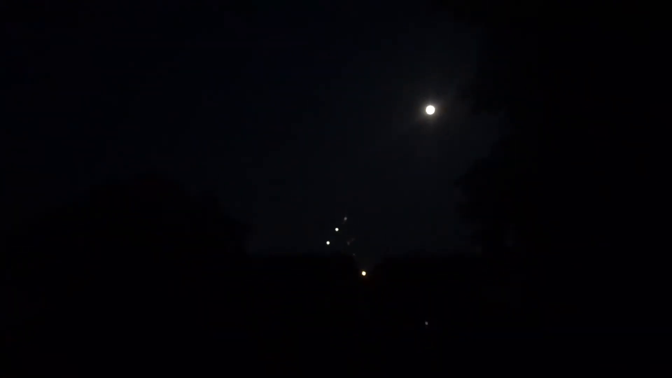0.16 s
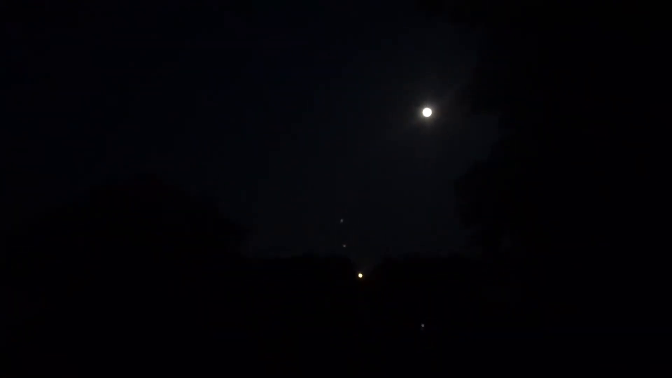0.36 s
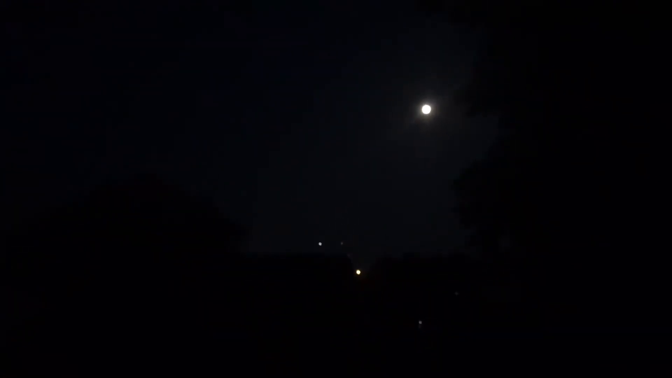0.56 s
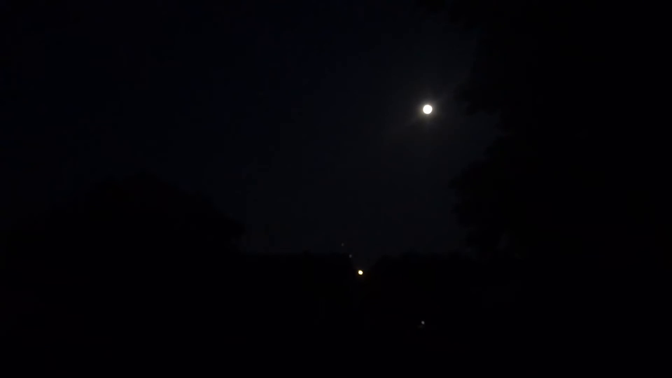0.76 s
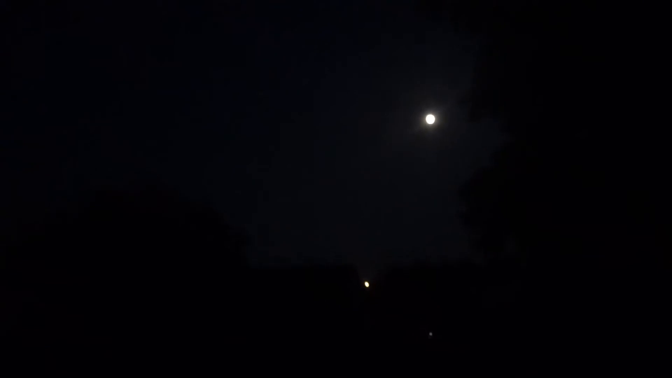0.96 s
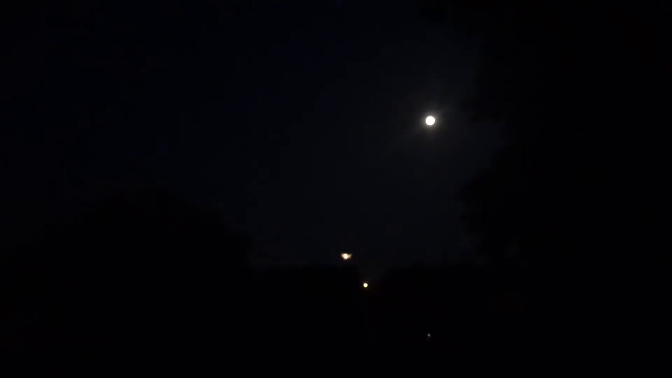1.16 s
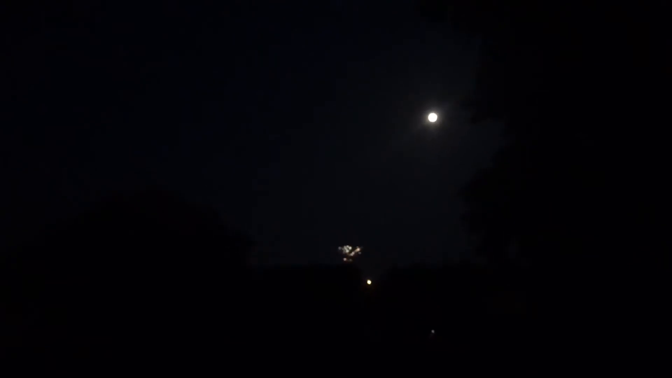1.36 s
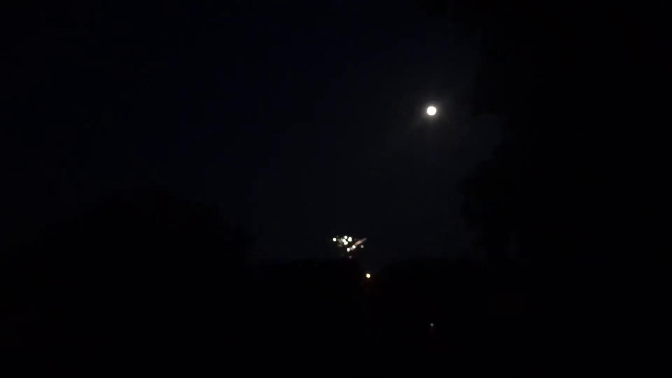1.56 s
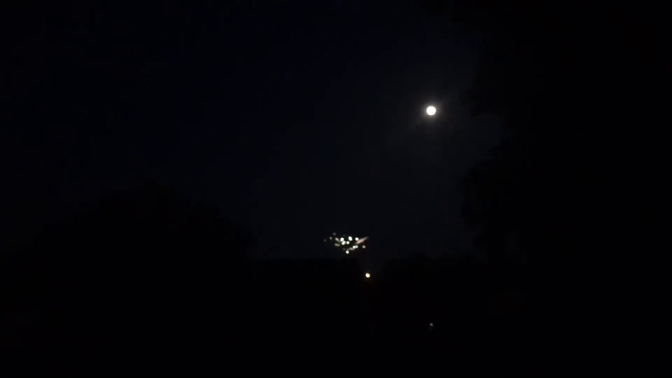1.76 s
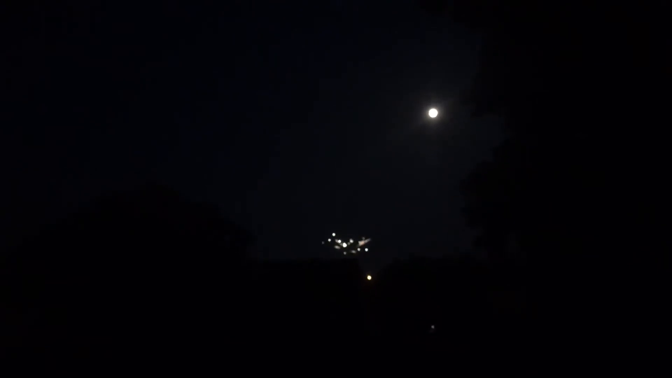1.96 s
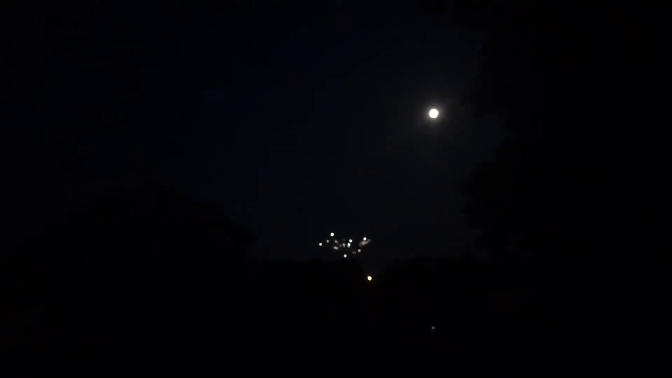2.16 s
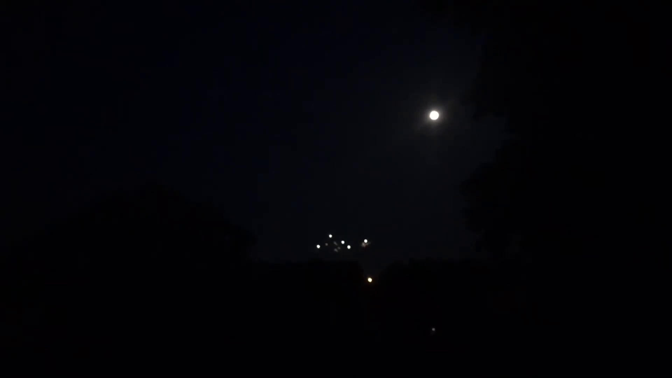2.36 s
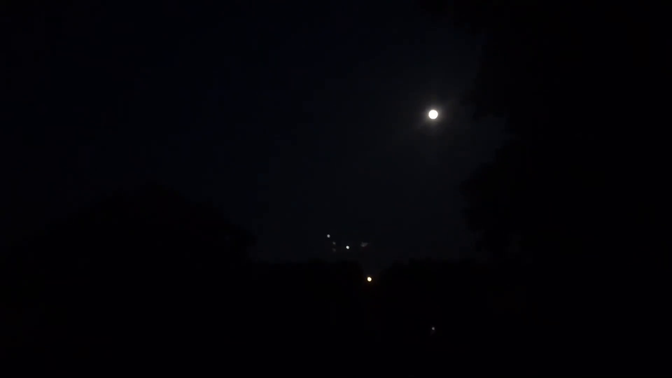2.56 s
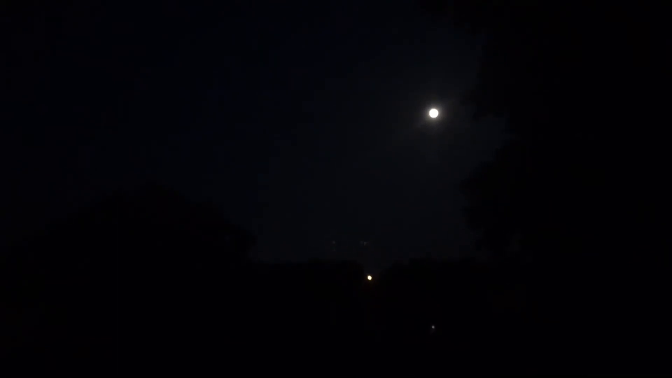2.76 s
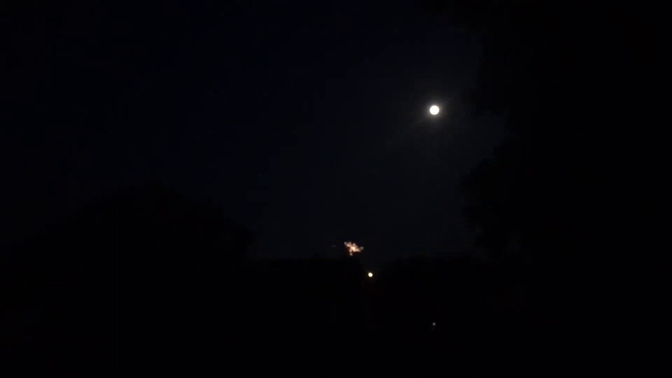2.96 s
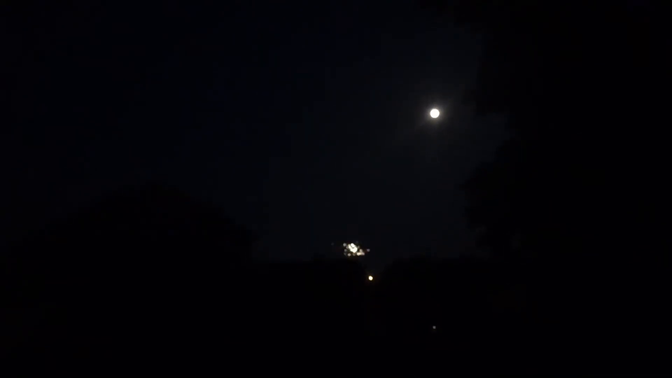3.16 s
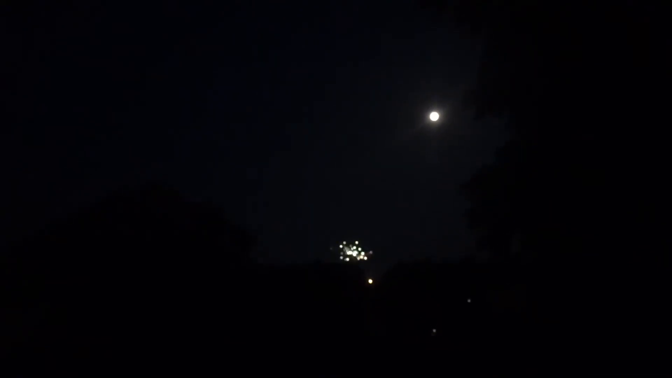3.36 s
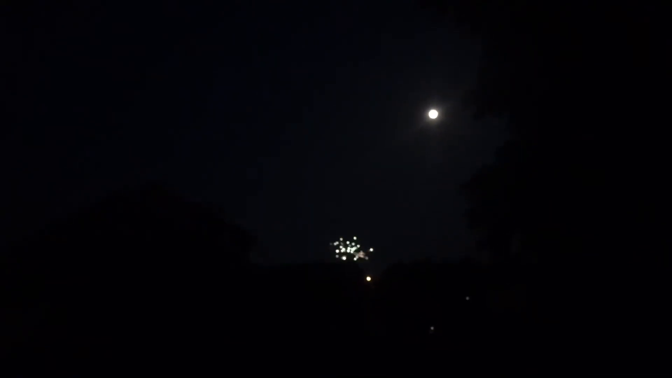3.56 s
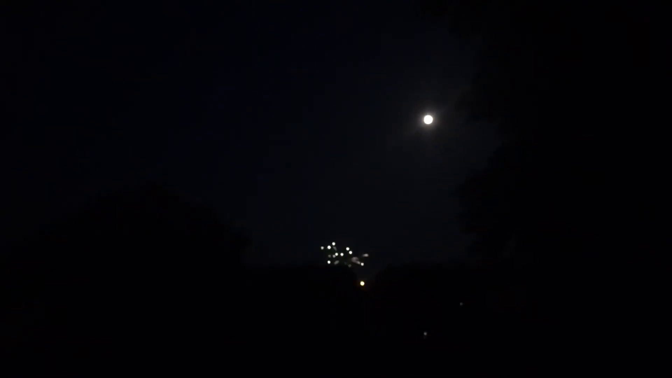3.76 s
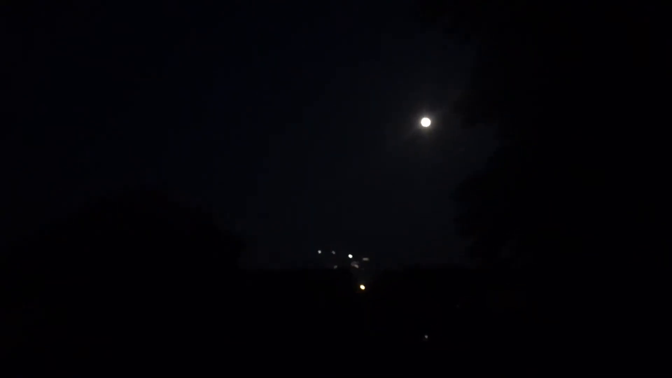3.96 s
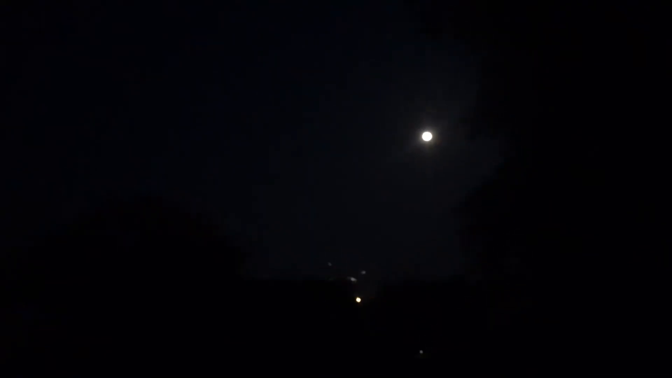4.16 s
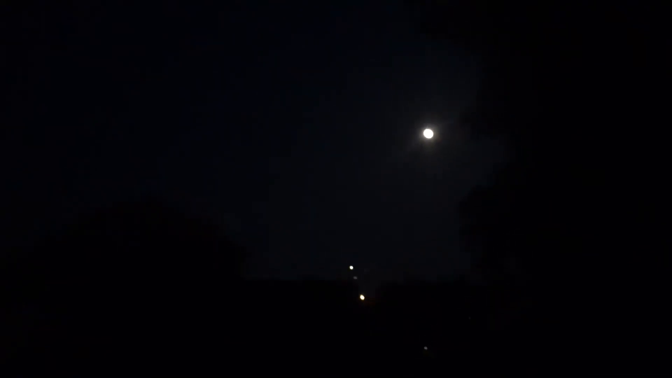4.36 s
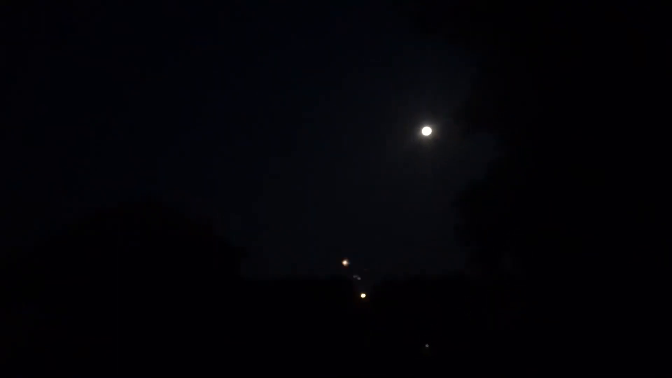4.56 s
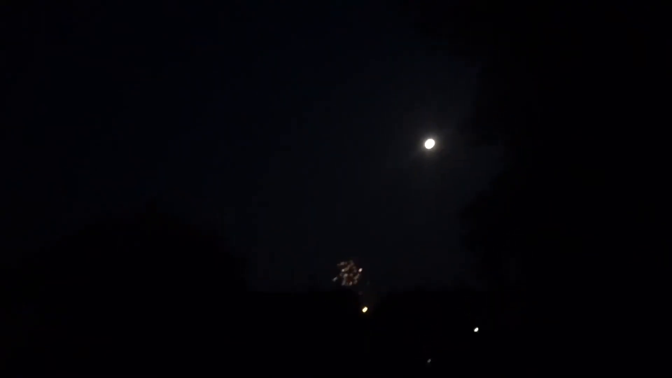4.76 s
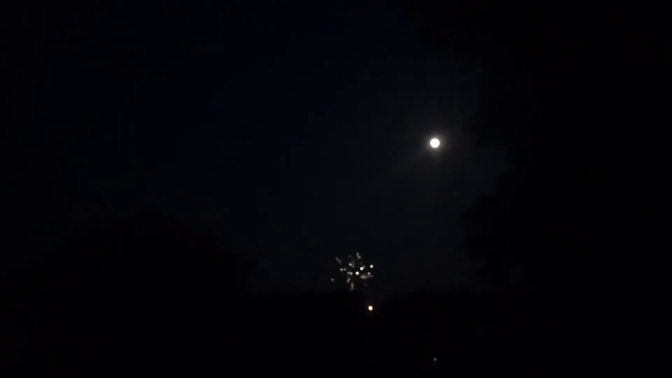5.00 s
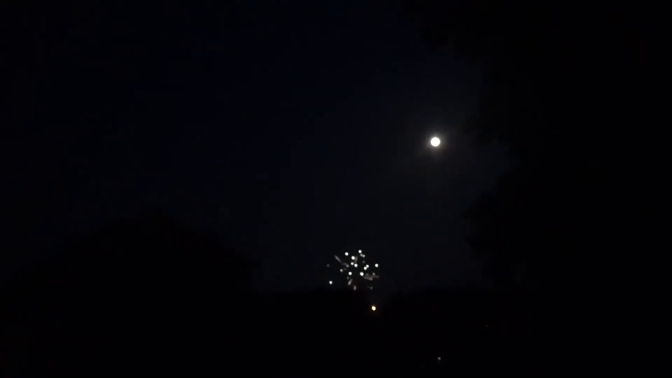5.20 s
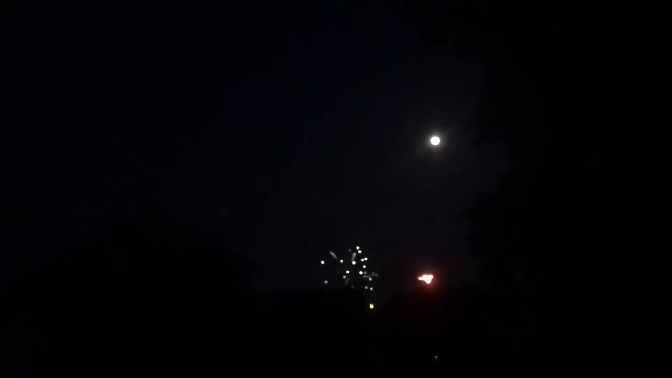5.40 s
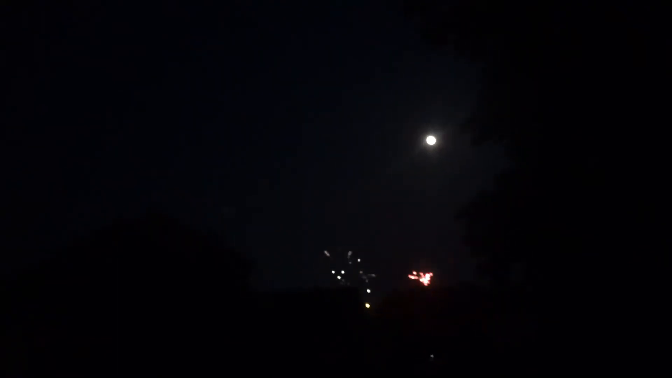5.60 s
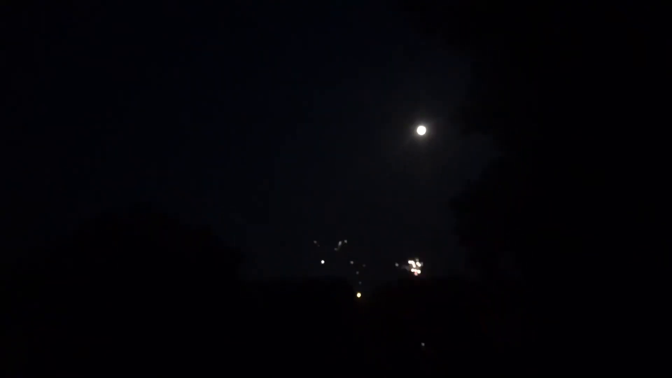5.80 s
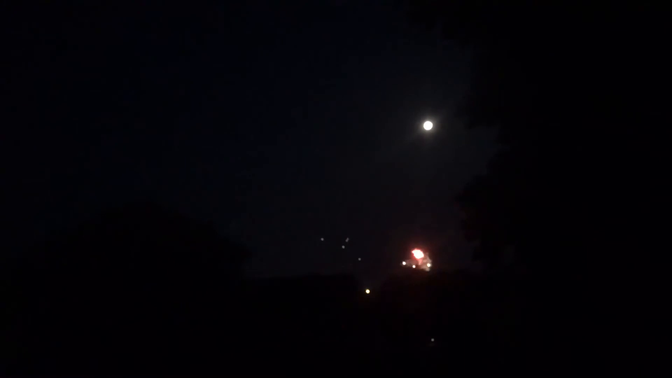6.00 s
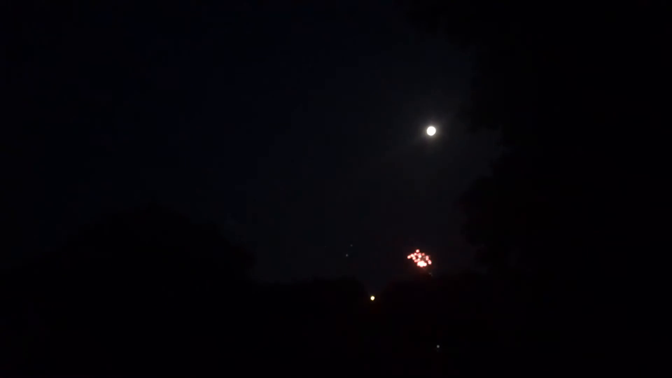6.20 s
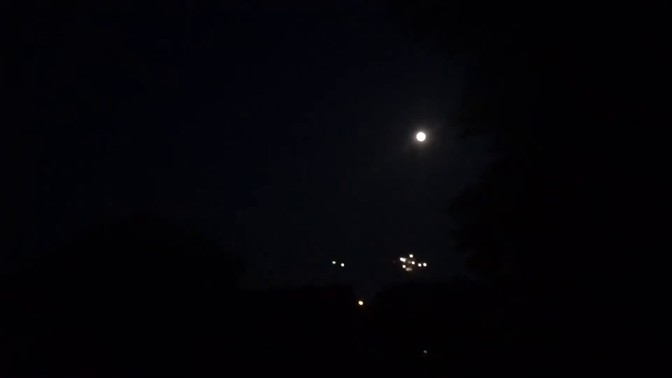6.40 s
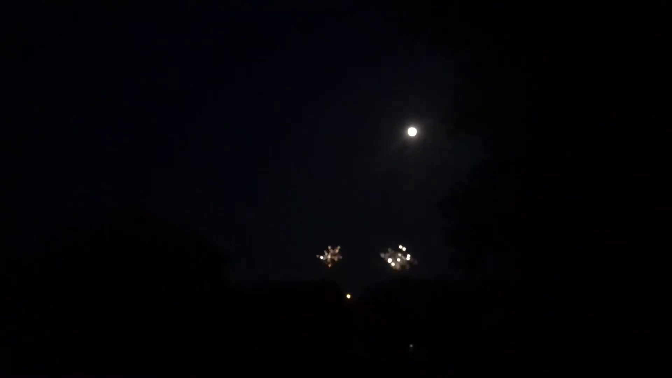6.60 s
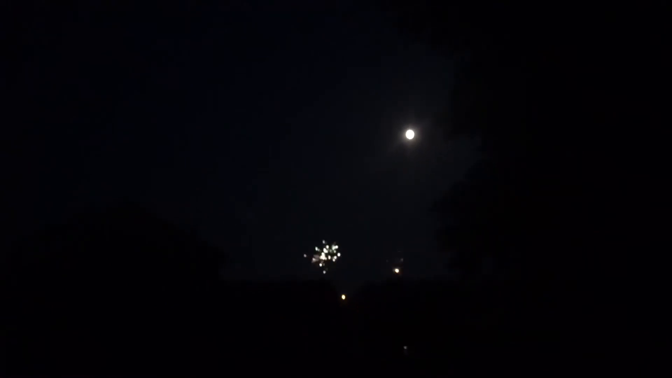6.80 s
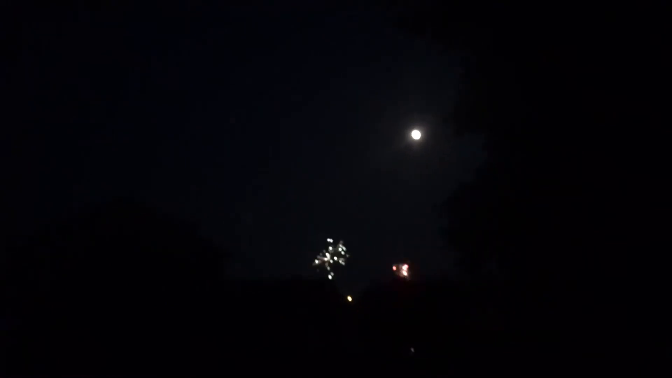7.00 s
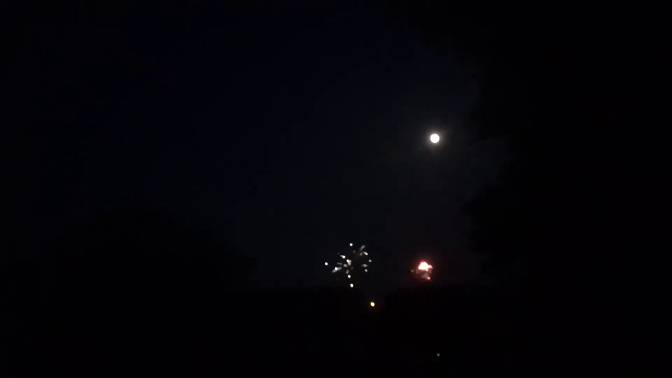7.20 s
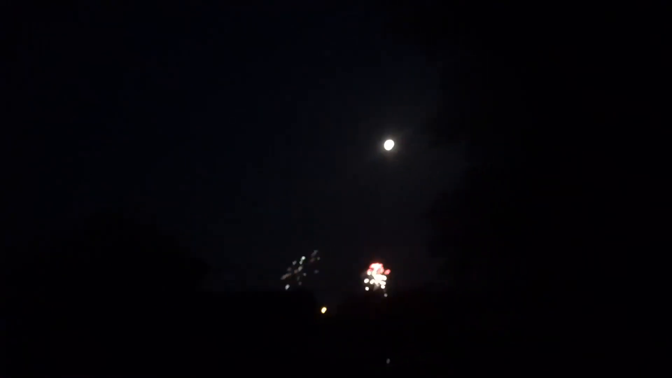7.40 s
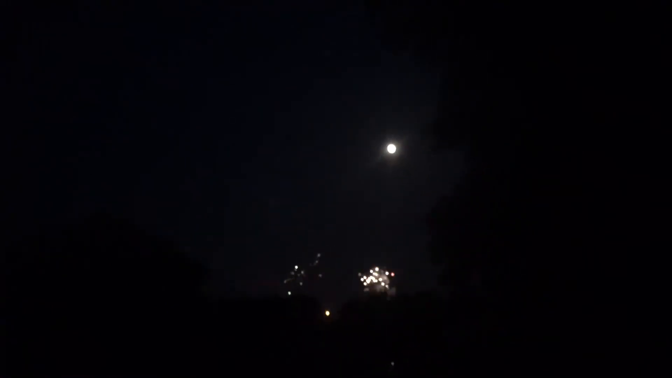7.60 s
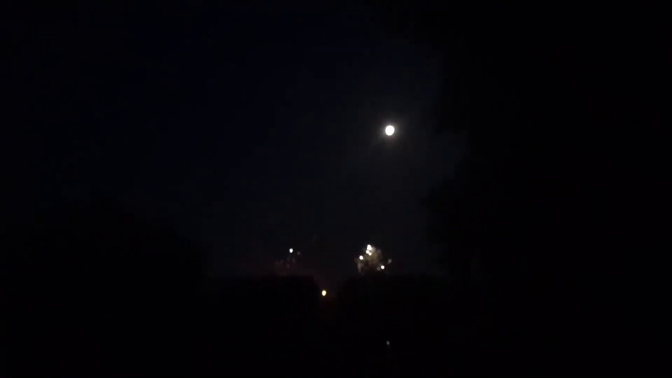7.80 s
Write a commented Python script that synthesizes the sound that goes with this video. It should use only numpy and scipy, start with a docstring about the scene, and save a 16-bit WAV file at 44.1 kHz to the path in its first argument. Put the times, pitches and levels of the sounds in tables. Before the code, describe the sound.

Far-off firework bursts crack and echo outdoors, widely spaced at first and quicker near the end, with brief hisses, a low hum and rustling leaves.

```python
"""Distant fireworks at night

Firework shells burst far off over trees and houses, heard by one microphone. Each bang is a pressure pulse
with its ground reflection; shaped noise is its scatter in the trees, and further pulses are its echoes
off walls and, a fifth of a second later, a big house front. Swelling noise is the hiss of rising shells
near the end. Grainy noise is the faint rustle of leaves nearby, steady noise the wash of a distant town,
and wavering sines the hum of machinery."""
import sys
import numpy as np
from scipy import signal
from scipy.fft import rfft, irfft, next_fast_len
from scipy.io import wavfile

SR = 44100
rng = np.random.default_rng(int(sys.argv[2]) if len(sys.argv) > 2 else 0)


def persist_wave(psi):
    """Save psi, clipped to +-1, as 16-bit WAV."""
    counts = np.round(np.clip(psi, -1, 1) * 32767).astype(np.int16)
    wavfile.write(sys.argv[1], SR, np.atleast_2d(counts).T)


N = 346185
T = np.arange(N) / SR
# time left ahead of each pulse for its earliest side paths (s)
LEAD_S = 0.02

# Faces of the big house front. Each row: echo delay in seconds, relative level in dB,
# treble tilt in dB per unit of log(1 + f / 2000 Hz).
FRONT = [(0.2172, -0.5, -0.5), (0.2254, -11.5, 13.5), (.2870, -17, 2.5)]
# Spectrum of a wall's echo. Each row: frequency in Hz, relative level in dB.
SLAP = [(40, -63), (150, -63), (230, -9.5), (420, 9.5), (780, 6), (1150, -4.5), (1500, -15.5), (2100, -15),
        (3000, -24.5), (6500, -49.5), (14000, -91)]
# Spectrum of rustling leaves. Each row: frequency in Hz, relative level in dB per Hz.
LEAF = [(1500, -32), (3000, 1.5), (4500, 1.5), (6500, 4), (9000, -4), (13000, -7.5), (15500, -14.5)]


def undb(db):
    """Level is logarithmic: 20 dB is a tenfold amplitude."""
    return 10 ** (np.asarray(db) / 20)


def curve(rows):
    """Linear interpolation in time joins rows of (s, value)."""
    return np.interp(T, *np.transpose(rows))


def spectrum_db(points, hz):
    """Interpolation on a log-frequency axis joins rows of (Hz, dB)."""
    point_hz, db = np.transpose(points)
    return np.interp(np.log(hz + 1), np.log(point_hz), db)


def colour(x, points):
    """Linear filtering multiplies the spectrum by a gain curve; the result has rms 1."""
    size = next_fast_len(len(x), real=True)
    gain = undb(spectrum_db(points, np.fft.rfftfreq(size, 1 / SR)))
    y = irfft(rfft(x, size) * gain, size)[:len(x)]
    return y / np.std(y)


def walk(rate):
    """Low-pass noise is a smooth random wander, up to about rate in Hz, with a spread of 1."""
    size = next_fast_len(N, real=True)
    hz = np.fft.rfftfreq(size, 1 / SR)
    y = irfft(rfft(rng.standard_normal(size)) / (1 + (hz / rate) ** 4), size)[:N]
    return (y - y.mean()) / y.std()


def add(out, s, x):
    """Superposition: sounds add from time s, and what falls outside is dropped."""
    i = int(round(s * SR))
    a, b = max(i, 0), min(i + len(x), len(out))
    if b > a:
        out[a:b] += x[a - i:b - i]


def town():
    """Many far sources of traffic sum incoherently to a steady noise that barely swells."""
    # Each row: frequency in Hz, relative level in dB per Hz.
    town_spectrum = [(20, -34), (33, -23), (45, 3), (70, 0.5), (120, -3), (185, -11), (290, -9.5),
                     (350, -5), (480, -10), (950, -10), (1300, -16.5), (1650, -14), (2200, -22),
                     (6000, -33), (15000, -57.5)]
    level_db = -44.5 + 0.4 * walk(3)
    return colour(rng.standard_normal(N), town_spectrum) * undb(level_db)


def hum():
    """Periodic machinery radiates low tones, which waver a little in level and pitch on their way."""
    # Each row: frequency in Hz, rms level in dB.
    tones = [(43, -78), (58.6, -54.5), (76.4, -51), (85, -59.5), (120, -62.5), (153, -75), (240, -64)]
    out = np.zeros(N)
    for hz, db in tones:
        phase = 2 * np.pi * np.cumsum(hz + 0.5 * walk(2)) / SR
        line = np.sin(phase) * undb(1.8 * walk(3))
        out += undb(db) * line / np.std(line)
    return out


def tick(decay_s, size=8192):
    """Impulsive contact: one leaf brushes another, a short dry decaying burst with peak 1."""
    y = colour(rng.standard_normal(size), LEAF) * np.exp(-np.arange(size) / SR / decay_s)
    return y / np.abs(y).max()


def leaves(gust_db=0.5, count=48):
    """Random small contacts in a light breeze make noise in flurries of fine grains, with single ticks."""
    # Strength of the breeze. Each row: time in seconds, level in dB.
    breeze = [(0, -62.5), (4.0, -61.5), (4.8, -60), (6.7, -60.5), (7.85, -59)]
    # Loudest brushes of leaf on leaf. Each row: start in seconds, peak in dB, decay time in seconds.
    loud_ticks = [(0.356, -43, 0.0068), (1.185, -41.5, 0.042), (3.226, -38, 0.0037), (3.697, -37, 0.0064),
                  (3.79, -36.5, 0.0039), (4.600, -41, 0.02), (5.200, -43.5, 0.12)]
    flurry = undb(2.6 * walk(25) + 3 * walk(150) + 3 * walk(1500))
    breeze_db = curve(breeze) + gust_db * walk(1.9)
    out = colour(rng.standard_normal(N) * flurry, LEAF) * undb(breeze_db)
    for s, db, decay_s in loud_ticks:
        add(out, s, undb(db) * tick(decay_s))
    # fainter ticks fall at random
    mean_gap_s, peak_db, spread_db = 0.45, -47, 1.5
    starts = np.cumsum(rng.exponential(mean_gap_s, count))
    for s, chance in zip(starts, rng.standard_normal(count)):
        add(out, s, undb(peak_db + spread_db * chance) * tick(decay_s=0.0055))
    return out


def climb(sputter_db=1.9, spark_db=3.0):
    """Turbulent burning in rising shells is modulated noise; the house front reflects it after a delay."""
    # Each row: time in seconds when the hiss is fully up, level in dB.
    climbs = [(7.13, -38), (7.78, -44.5)]
    # Each row: frequency in Hz, relative level in dB per Hz.
    hiss_spectrum = [(200, -12), (600, 9.5), (1000, 10), (1900, 8.5), (3900, -2), (6500, -13), (12000, -55)]
    swell_db_per_s, hold_s, fade_db_per_s = 136, 0.091, 122.5
    swell = np.zeros(N)
    for s, db in climbs:
        rise_db = swell_db_per_s * np.maximum(s - T, 0)
        fade_db = fade_db_per_s * np.maximum(T - s - hold_s, 0)
        swell += undb(db - rise_db - fade_db)
    sparks = rng.standard_normal(N) * undb(spark_db * walk(600))
    hiss = colour(sparks, hiss_spectrum) * swell * undb(sputter_db * walk(60))
    out = hiss.copy()
    add(out, FRONT[1][0], undb(-5) * hiss)
    return out


def pulse(points, treble_db, bass_db, pitch, lag_ms, ground, ripple, ripple_hz, spread_ms,
          treble_hz=2000, bass_hz=380, size=4096):
    """Interference of a causal pulse, its ground reflection and side paths; rms 1 over 5 ms, LEAD_S in."""
    hz = np.fft.rfftfreq(size, 1 / SR)
    treble_tilt = treble_db * np.log1p(hz / treble_hz)
    bass_shelf = bass_db / (1 + (hz / bass_hz) ** 2)
    db = spectrum_db(points, hz / pitch) + treble_tilt + bass_shelf
    # folding the cepstrum makes the pulse causal
    cepstrum = irfft(np.log(undb(db)))
    cepstrum[1:size // 2] *= 2
    cepstrum[size // 2 + 1:] = 0
    bounce = ground * np.exp(-2j * np.pi * hz * lag_ms / 1000)
    # side paths a little longer and shorter cut each pulse's own notches, mostly above ripple_hz
    bunch = np.exp(-np.abs(np.arange(size) / SR - LEAD_S) * 1000 / spread_ms)
    side = rfft(rng.standard_normal(size) * bunch / np.linalg.norm(bunch))
    paths = np.exp(-2j * np.pi * hz * LEAD_S) + ripple * side * hz / (hz + ripple_hz)
    y = irfft(np.exp(rfft(cepstrum)) * (1 + bounce) * paths)
    return y * np.sqrt(0.005 * SR / np.sum(y ** 2))


def thumps():
    """Path loss: a long way round takes the treble, so late echoes and faint far sounds are soft thuds."""
    # Each row: arrival in seconds, rms level over 5 ms in dB.
    soft_thuds = [(2.655, -37), (3.012, -39), (6.094, -39)]
    out = np.zeros(N)
    for s, db in soft_thuds:
        thud = pulse(SLAP, -12, 0, 0.66, lag_ms=1.54, ground=0.42, ripple=1.4, ripple_hz=200, spread_ms=11)
        add(out, s - LEAD_S, undb(db) * thud)
    return out


def scatter(near_db, near_t60, far_db, far_t60, patchy_db, grain_db=6.0, onset_s=0.00091,
            damping_hz=3000, size=65536):
    """Multiple scattering: a quick splash from near trees, then a long uneven roll that grows duller."""
    # Each row: frequency in Hz, relative level in dB.
    scatter_spectrum = [(50, -24), (170, -5.5), (330, 0), (480, -1), (700, 3.5), (1050, -3.5), (1400, -6.5),
                        (2600, -11.5), (4200, -21), (7000, -34.5), (14000, -79)]
    t = np.arange(size) / SR
    patches = np.repeat(rng.uniform(-1, 1, size // 256), 256)

    def echoes():
        """Countless small echoes superpose to noise of uneven strength."""
        strength_db = patchy_db * patches + grain_db * rng.standard_normal(size)
        return colour(rng.standard_normal(size) * undb(strength_db), scatter_spectrum)

    near, far = echoes(), echoes()
    dull = signal.sosfilt(signal.butter(1, damping_hz, fs=SR, output="sos"), far)
    # each decay falls 60 dB in its t60, in seconds
    fade = undb(-60 * t / far_t60)
    splash = undb(near_db) * undb(-60 * t / near_t60) * near
    # the treble fades twice as fast as the dull part
    roll = undb(far_db) * fade * (dull + fade * (far - dull))
    onset = 1 - np.exp(-t / onset_s)
    return onset * (splash + roll)


def treetops(delay=0.075, width=0.036, size=8192):
    """Diffuse reflection: the foliage of a row of trees throws treble back as a soft splash."""
    # Each row: frequency in Hz, relative level in dB.
    foliage = [(500, -17), (2000, 8), (4000, 7), (6500, -5.5), (12000, -37)]
    t = np.arange(size) / SR
    return colour(rng.standard_normal(size), foliage) * np.exp(-((t - delay) / width) ** 2)


def knock(treble_db, pitch):
    """Reflection off a small, uneven wall is weak in bass and returns a rounded knock."""
    return pulse(SLAP, treble_db, -21.5, pitch, lag_ms=1.15, ground=0.37,
                 ripple=1.0, ripple_hz=300, spread_ms=2.8)


def slap(treble_db, bass_db, pitch):
    """Specular reflection off a big flat front, lightly smeared by its sills and eaves."""
    return pulse(SLAP, treble_db, bass_db, pitch, lag_ms=0.93, ground=0.6,
                 ripple=0.45, ripple_hz=700, spread_ms=4)


def bang(treble_db, bass_db):
    """Interference with the ground cuts the same notches in every bang; turbulent air frays the treble."""
    # Each row: frequency in Hz, relative level in dB.
    bang_spectrum = [(30, -28), (90, -8), (150, -11), (280, 2.5), (520, 10), (700, 2), (1120, -6),
                     (1600, -14), (2400, -35), (3400, -19), (5000, -29.5), (8000, -41), (15000, -68)]
    return pulse(bang_spectrum, treble_db, bass_db, 1, lag_ms=1.124, ground=1.38,
                 ripple=1.9, ripple_hz=6950, spread_ms=0.72)


def fireworks():
    """Multipath arrival: each shell's bang, its scatter, and echoes of the same walls at fixed delays."""
    # Shell bursts. Each row: arrival in seconds, rms level over 5 ms in dB, treble tilt in dB per unit of
    # log(1 + f / 2000 Hz), bass shelf in dB, pitch ratio of the echoes, scatter relative to the bang in dB,
    # level off the small walls in dB, level off the big house front in dB, tilt of the front's echo.
    bursts = [(-0.1008, -12, 8, -17, 0.85, 2, -22.5, -14, 0),
              (2.1503, -9, 3.5, -1, 1.03, -1, -21.5, -12, 1),
              (3.8685, -10.5, 2.5, -4, 1.14, -0.5, -25.5, -10, -12),
              (5.5891, -9.5, -5, 3.5, 0.91, 0.5, -25, -10.5, 3.5),
              (6.569, -13.5, -3, -1, 0.956, 0.5, -25, -17, -7.5),
              (7.1972, -13, 1, 2, 0.91, 1.5, -26, -18, 2),
              (7.4691, -12.5, 0, 4, 1.12, 1.5, -24.5, -14.5, -7)]
    # Smaller walls and tree lines. Each row: echo delay in seconds, relative level in dB, treble tilt.
    walls = [(0.146, -2, 6), (0.1671, -9.5, 18), (.340, -12.5, 1), (.510, -21, -44)]
    # Lesser pops. Each row: arrival in seconds, rms level over 5 ms in dB, treble tilt.
    pops = [(0.070, -36, 4), (6.608, -26, -5), (6.813, -35, 17), (7.2465, -24, -18)]
    # a thin forerunner slips through the trees ahead of each bang
    forerunner_s, forerunner_db = 0.00146, -12.5
    out = np.zeros(N)
    for s, db, treble_db, bass_db, pitch, scatter_db, walls_db, front_db, front_treble_db in bursts:
        start = s - LEAD_S
        add(out, start - forerunner_s, undb(db + forerunner_db) * knock(treble_db + 17, 0.97))
        add(out, start - 0.0004, undb(db) * bang(treble_db, bass_db))
        trees = scatter(near_db=-10.5, near_t60=0.16, far_db=-27.5, far_t60=3.65, patchy_db=3.5)
        add(out, s, undb(db + scatter_db) * trees)
        add(out, s, undb(db + treble_db - 38.5) * treetops())
        for delay, wall_db, wall_treble_db in walls:
            add(out, start + delay, undb(walls_db + wall_db) * knock(wall_treble_db, pitch))
        for delay, face_db, face_treble_db in FRONT:
            echo = slap(front_treble_db + face_treble_db, bass_db, pitch)
            add(out, start + delay, undb(front_db + face_db) * echo)
        front_scatter = scatter(near_db=-17.5, near_t60=0.09, far_db=-22, far_t60=0.46, patchy_db=-2.0)
        add(out, s + FRONT[0][0], undb(front_db) * front_scatter)
    for s, db, treble_db in pops:
        add(out, s - LEAD_S, undb(db) * knock(treble_db, 1))
    return out


def scene():
    """Superposition of the night background and the fireworks, as one channel."""
    background = town() + hum() + leaves()
    return (background + climb() + thumps() + fireworks())[None]


def record(dry):
    """Linear filtering: the microphone's port ripples the treble; the recorder cuts deepest bass and top."""
    # Colour of the port. Each row: frequency in Hz, gain in dB.
    port = [(2500, -0.5), (3250, 1), (3700, -1), (4350, 3), (4900, -2), (5600, -1), (6350, 0), (7000, -1.5),
            (8800, 0.5), (10400, -2.5), (12000, 0)]
    size = next_fast_len(N + 4096, real=True)
    gain = undb(spectrum_db(port, np.fft.rfftfreq(size, 1 / SR)))
    heard = irfft(rfft(dry, size) * gain, size)[:, :N]
    low_cut = signal.butter(6, 36, "high", fs=SR, output="sos")
    top_cut = signal.ellip(10, 0.2, 70, 15700, fs=SR, output="sos")
    return signal.sosfilt(top_cut, signal.sosfilt(low_cut, heard))


dry = scene()
out = record(dry)
persist_wave(out)
```